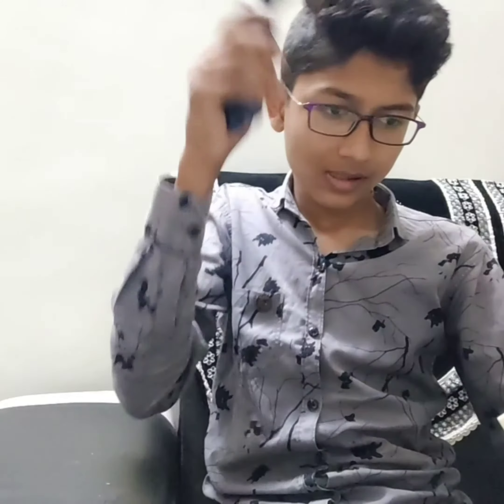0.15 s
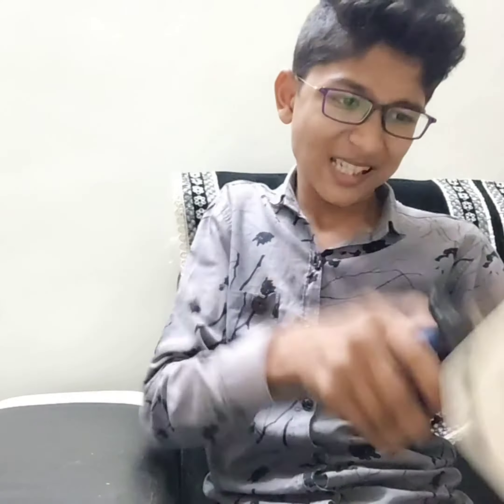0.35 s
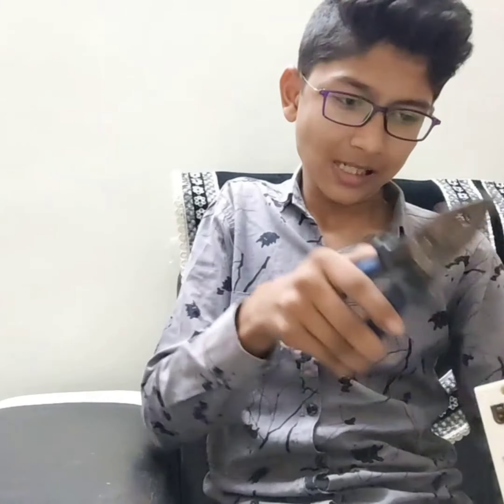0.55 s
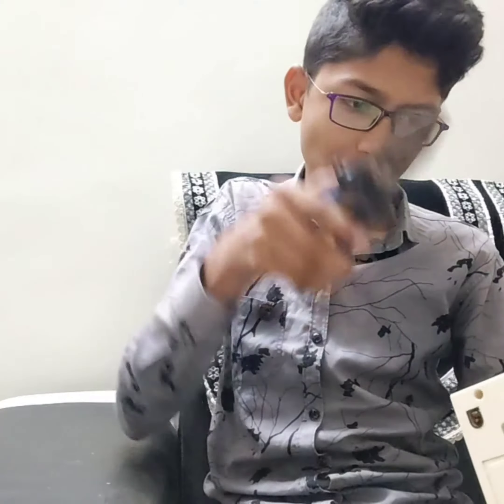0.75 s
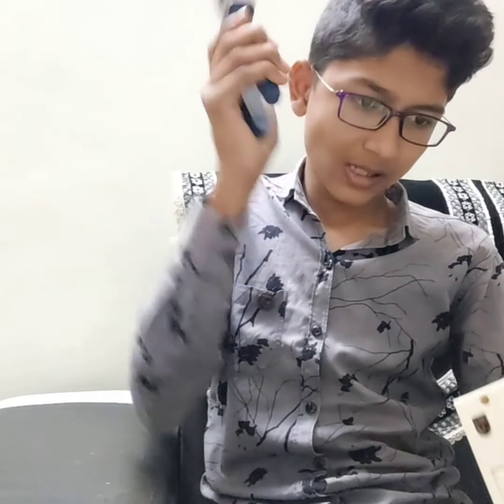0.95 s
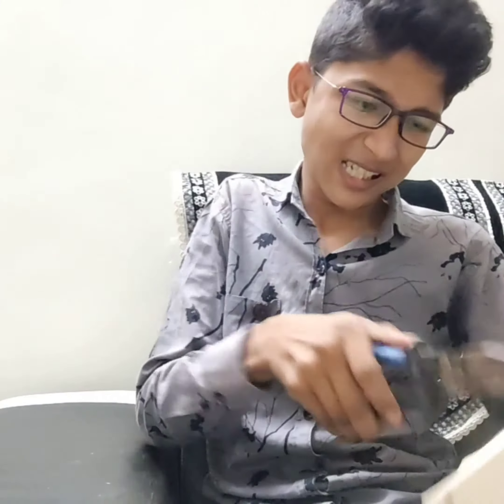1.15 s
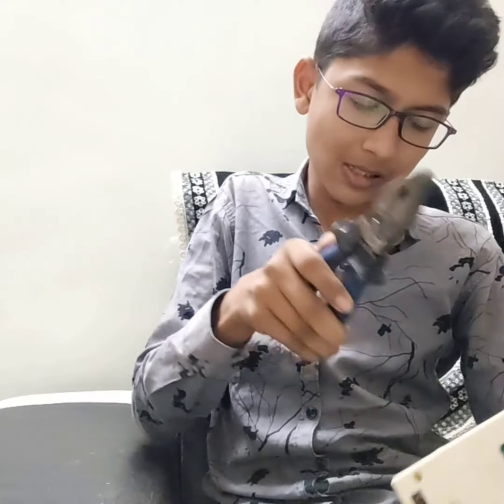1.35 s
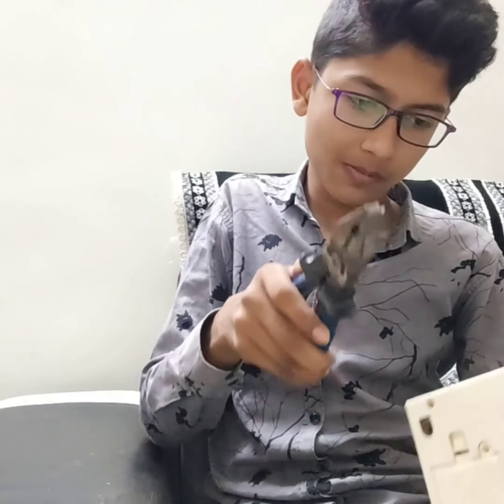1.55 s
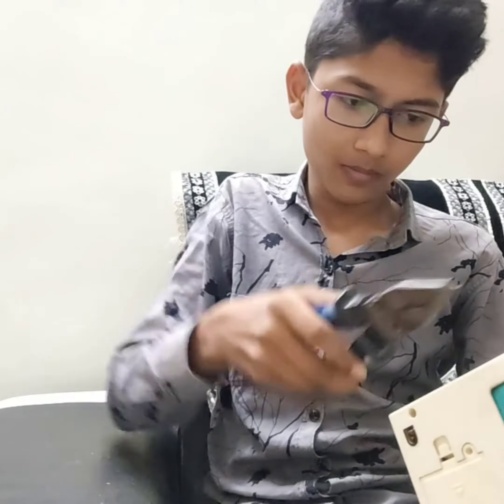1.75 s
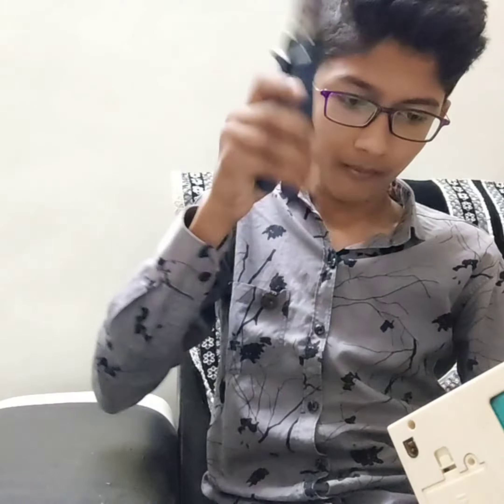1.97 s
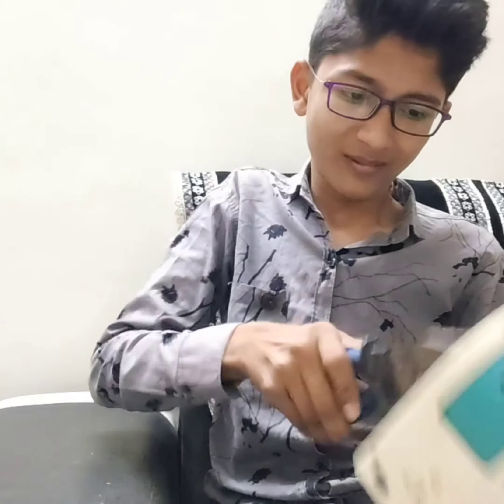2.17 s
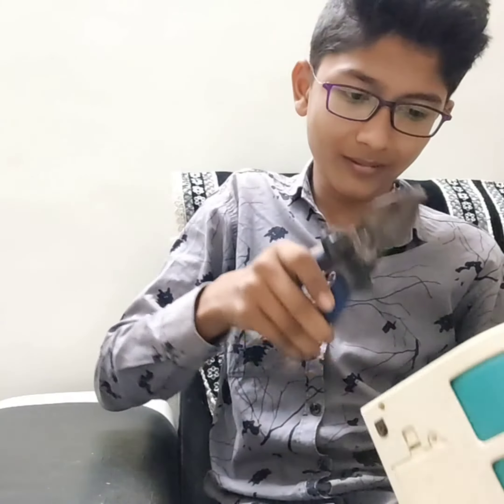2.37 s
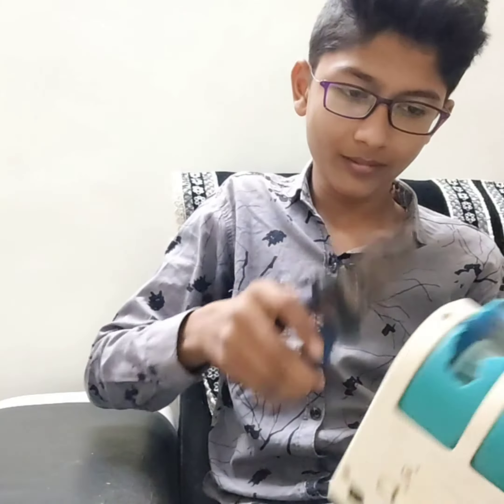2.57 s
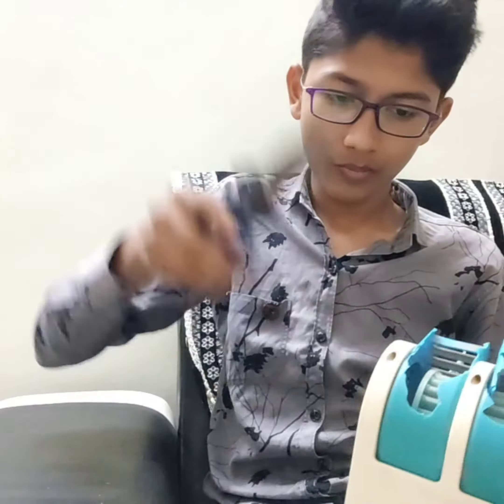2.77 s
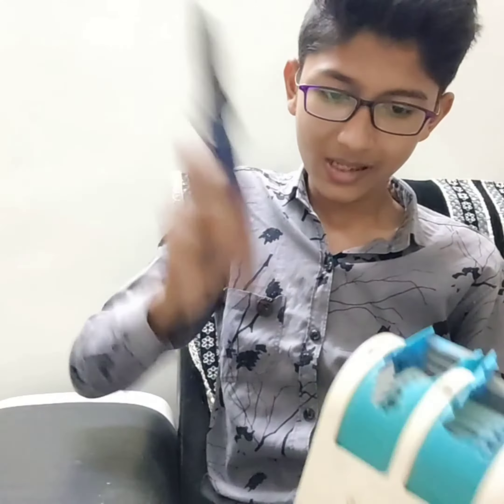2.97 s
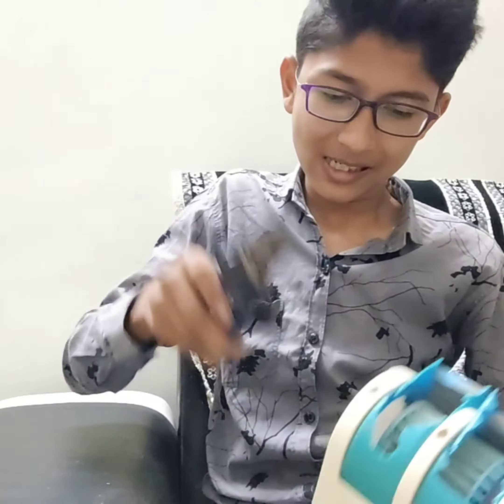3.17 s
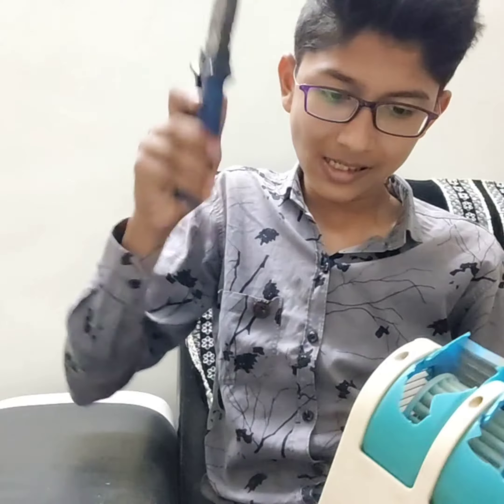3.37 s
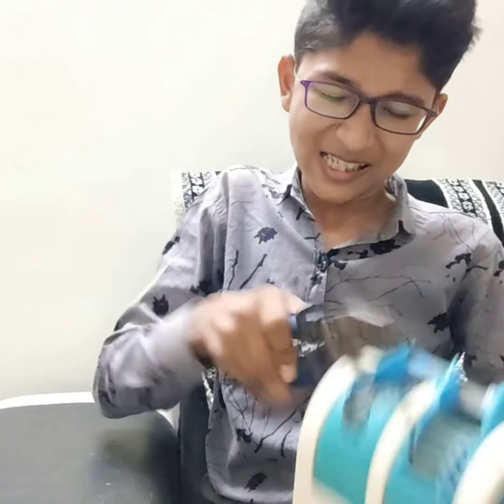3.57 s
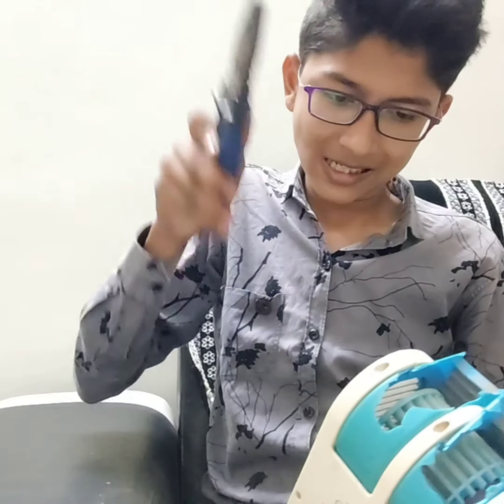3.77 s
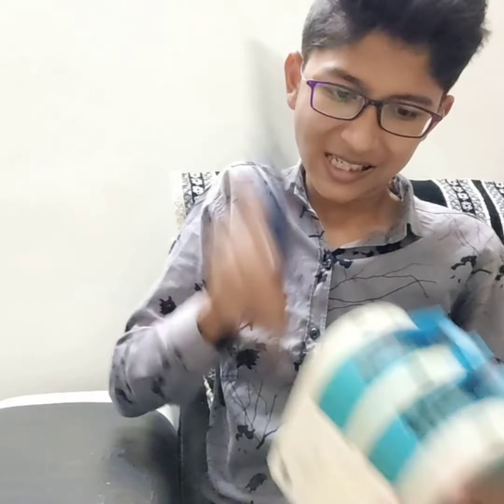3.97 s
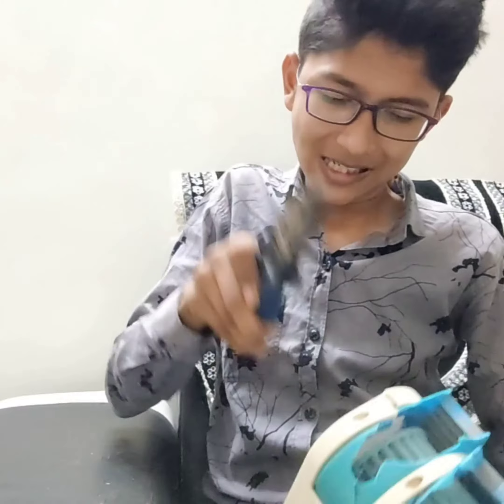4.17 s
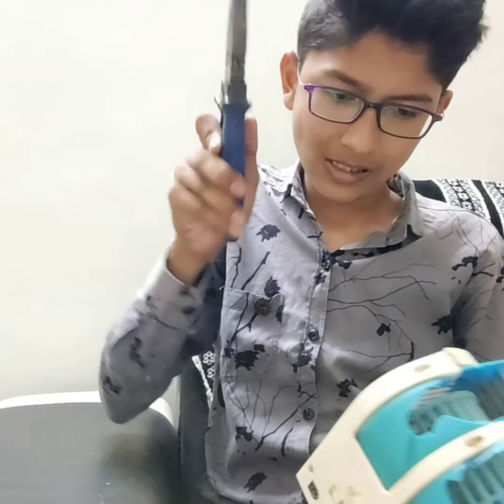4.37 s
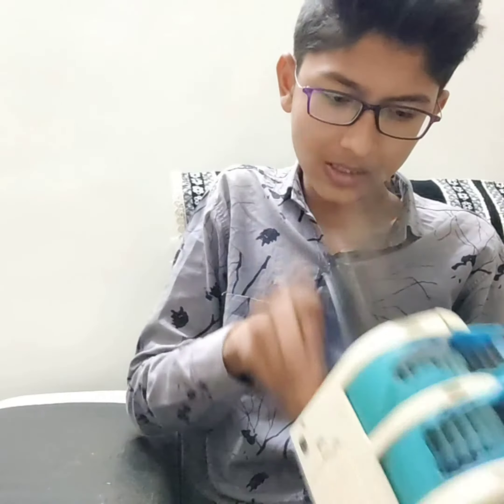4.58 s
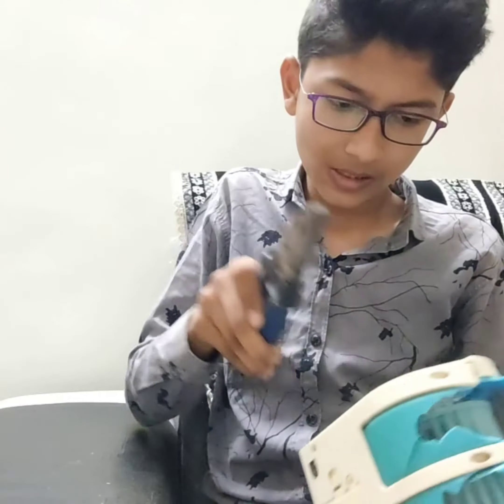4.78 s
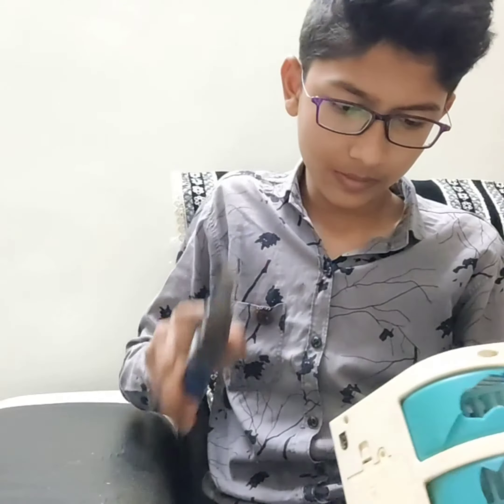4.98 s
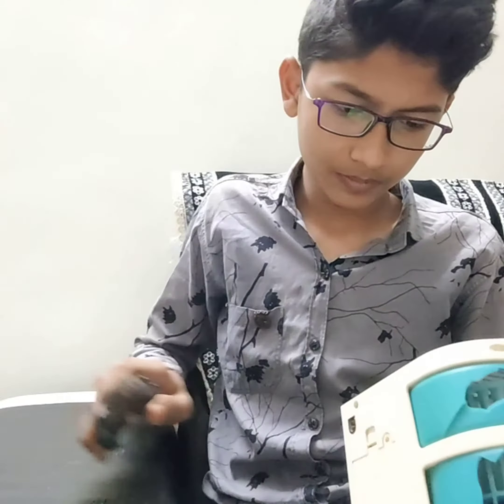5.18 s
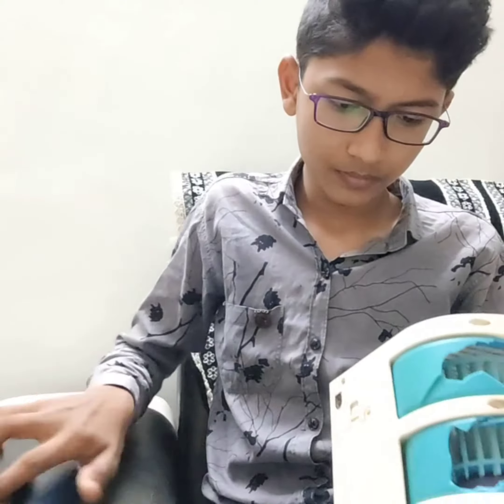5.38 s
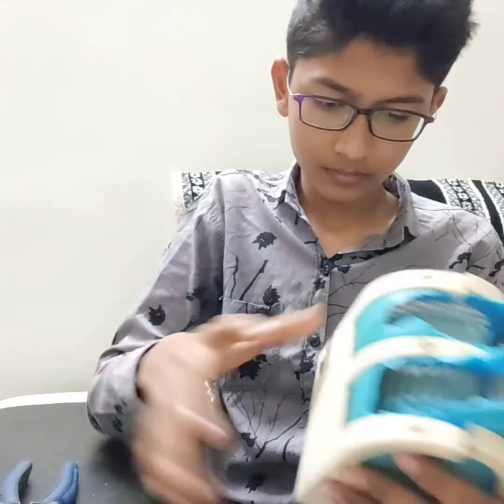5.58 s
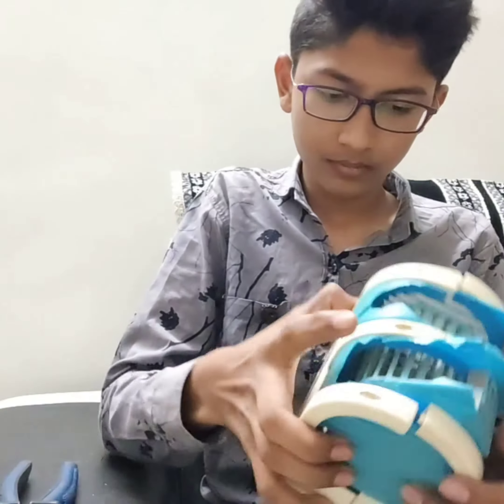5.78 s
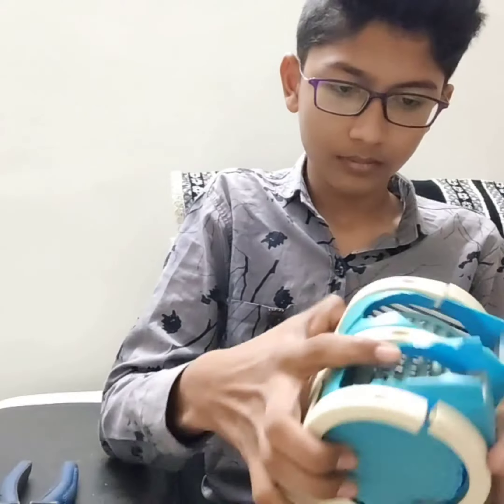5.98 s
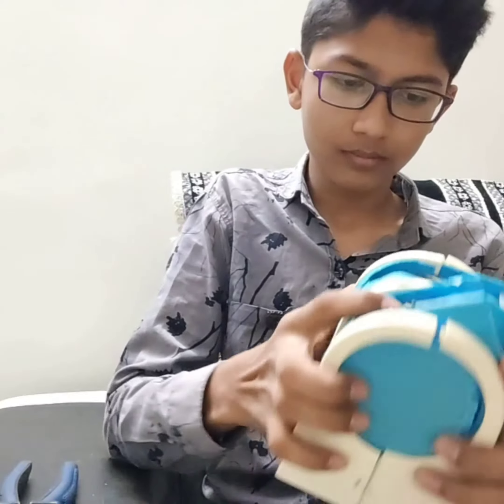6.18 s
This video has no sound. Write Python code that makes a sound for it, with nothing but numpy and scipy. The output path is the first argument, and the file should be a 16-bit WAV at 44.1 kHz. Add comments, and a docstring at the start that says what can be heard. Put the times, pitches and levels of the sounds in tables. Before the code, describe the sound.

Steel pliers hammer a hollow plastic appliance housing in eight hard, cracking blows that echo in a bare room, then faint taps and finger rubbing.

```python
"""Pliers on a plastic housing

Steel pliers hammer the plastic housing of a small appliance, eight blows in a bare, echoing room.
Each blow is filtered noise: a snap, a crush of small fractures and a thump of the hollow shell, all with echo.
Loose jaws tick between swings; then air stirs, the pliers are laid on the table, and fingers tap and slide
on the housing. Room hush, hiss and low rumble lie beneath. A phone's limiter ducks loud blows."""
import sys
import numpy as np
from scipy import signal
from scipy.fft import rfft, irfft, next_fast_len
from scipy.io import wavfile
from scipy.ndimage import uniform_filter1d, minimum_filter1d, map_coordinates

SR = 44100
rng = np.random.default_rng(int(sys.argv[2]) if len(sys.argv) > 2 else 0)


def materialize(psi):
    """Save the field psi as 16-bit PCM at rate SR to the path in sys.argv[1].

    A 1-D psi becomes a single channel; in a 2-D psi each row is a channel.
    """
    bounded = np.clip(np.atleast_2d(psi).T, -1, 1)
    quanta = np.round(bounded * 32767).astype(np.int16)
    wavfile.write(sys.argv[1], SR, quanta)


N = 275079
TIME_S = np.arange(N) / SR
AGE_S = np.arange(SR // 4) / SR  # time since a contact

# Hammer blows. Each row: start in seconds, gain of the whole blow in dB, crush gain in dB,
# crush length in seconds, thump gain in dB, thump length in seconds, thump pitch in Hz,
# base treble tilt in dB per decade, panel mode in Hz, rib mode in Hz, air stirred by the lift before it in dB.
BLOW_ROWS = [(0.4215, -3.5, -4.5, 0.08, -1.5, 0.036, 164.4, 2.5, 646, 2930, -56),
             (1.1556, -5, -3, 0.074, -2, 0.034, 138, 1, 500, 900, -44),
             (2.1990, -4, -5.5, 0.041, -5.5, 0.0027, 212, -1, 860, 1450, -49.5),
             (2.6796, -15.5, -28, 0.006, -21, 0.0052, 130, -3.5, 1380, 1920, -46),
             (3.109, -4, -7, 0.048, -4.5, 0.0083, 138, 4, 1280, 2130, -47),
             (3.5820, -3.5, -5, 0.048, -5.5, 0.016, 144.4, 3.5, 1035, 1470, -48),
             (4.0522, -6, -4, 0.04, -7.5, 0.01, 136, 2.5, 877, 1760, -65),
             (4.64, 0, -14.5, 0.021, -19.5, 0.0058, 171.5, 4.5, 920, 3460, -67)]
# Light contacts with table and housing. Each row: start in seconds, gain in dB, thump gain in dB,
# treble tilt in dB per decade, panel mode in Hz, rib mode in Hz.
KNOCK_ROWS = [(5.4488, -32, -2, -8.5, 534, 11900), (5.461, -38.5, -2, -15, 320, 1200),
              (5.572, -49, -11, -1, 596, 5000), (5.686, -45, -23, -11, 1610, 2510),
              (5.706, -44, -20, -18, 850, 2800), (5.7217, -43, -22, -4, 1100, 2900),
              (5.795, -51, -7, 10, 800, 14100), (5.838, -53, -16, 4.5, 700, 9000),
              (5.969, -51, -3, 17, 600, 3000), (6.0759, -26, -27, -21.5, 810, 2380),
              (6.142, -49.5, 2, 5, 800, 13000)]
# Plier jaws touching. Each row: start in seconds, relative level in dB,
# lower and upper mode in dB over the click.
JAW_TICKS = [(1.8067, -20.5, 8, 10), (1.8093, -21.5, 15.5, 2), (1.936, -37, 25, 0), (1.956, -24.5, 14, 22),
             (2.086, -30, 31, 21), (2.1585, -31, 5, 15), (2.167, -30, 12, 4), (4.027, -40, 10.5, 0)]
# Steel jaw modes. Each row: frequency in Hz, width in Hz.
JAW_MODES = [(7036, 120), (7690, 90)]
# Housing resonances. Each row: frequency in Hz, width in Hz, strength in dB over a flat base.
SHELL_MODES = [(559, 29, 4), (586, 6.7, -3.5), (743.6, 19, 8), (904, 8.2, 7), (934, 12, 1.5),
               (1536, 15, 3.5), (1735, 86, -3), (2230, 140, -4), (3160, 100, -7), (3980, 150, -5.5)]
# Table top resonances. Each row: frequency in Hz, width in Hz, strength in dB over a flat base.
TABLE_MODES = [(98, 25, 23), (312, 33, 23), (474, 30, 14)]
# Spectrum of struck plastic. Each row: frequency in Hz, relative density in dB per Hz.
PLASTIC_SPECTRUM = [(40, -57), (200, -6.5), (350, -0.5), (600, 3.5), (1200, 1.5), (2200, 2.5), (3600, 1.5),
                    (4800, -1), (5800, -6.5), (7200, -1.5), (8800, -3), (11000, -6.5), (15500, -7.5)]
# Spectrum of the shell's thump. Each row: multiple of its pitch, relative density in dB per Hz.
THUMP_SPECTRUM = [(.15, -32), (.4, -11.5), (.75, 9), (1.3, 3.5), (2.4, 0), (4, -4.5), (8, -12), (25, -55)]
# Spectrum of a steel click. Each row: frequency in Hz, relative density in dB per Hz.
CLICK_SPECTRUM = [(300, -31), (2500, -11), (4200, -8), (5700, -11), (7300, -4), (10000, -5.5), (15000, 8)]
# Spectrum of the room hush. Each row: frequency in Hz, relative density in dB per Hz.
HUSH_SPECTRUM = [(15, -76.5), (25, -48), (87, -6.5), (127, -7), (229, -8), (285, -1.5), (344, -12),
                 (516, -11), (624, -9.5), (1230, -20), (1440, -25), (2110, -25), (4610, -47.5), (6920, -42),
                 (16000, -41)]
# Spectrum of stirred air and of the table boom. Each row: frequency in Hz, relative density in dB per Hz.
RUMBLE_SPECTRUM = [(25, -37.5), (60, -5.5), (95, 0), (160, -4), (260, -15), (500, -14.5), (1500, -57.5)]
# Colour of the microphone ports. Each row: frequency in Hz, left minus right in dB.
PORT_DIFFERENCE = [(200, 2), (900, -0.5), (3000, 1), (5500, 1), (7000, 6.5), (8600, -6.5), (11000, 1),
                   (14500, 7.5)]
# Decay of the room. Each row: frequency in Hz, time to fall 60 dB in seconds.
ROOM_T60 = [(150, 0.52), (550, 0.59), (1400, 0.61), (3600, 0.57), (8000, 0.5), (15000, 0.38)]
# Fingers sliding on the housing. Each row: firmest grip in seconds, level in dB,
# rise in seconds, fade in seconds.
SLIDE_ROWS = [(5.725, -42.5, 0.023, .05), (5.91, -54.5, .04, .08)]

EARLIER_BLOW_S = -0.44  # the blow before the scene opens
LIFT_MIDDLE_SHARE, LIFT_SPREAD_SHARE = 0.49, 0.32  # of the pause between blows
DOWNSWING_LEAD_S, DOWNSWING_SPREAD_S, DOWNSWING_DB = 0.035, 0.055, -48.5
# a last soft swell of low rumble before the pliers land
LAST_SWELL_S, LAST_SWELL_SPREAD_S, LAST_SWELL_DB = 5.2, 0.16, -46.5
STILL_AIR_DB = -59.5  # rumble while the arm rests
GRIP_DB = -62  # steady faint rub of the holding hand
LANDING_S, TABLE_START_DB, TABLE_T60_S = 5.45, -39, 0.55
BAND_LIMIT_HZ = 15450


def amp(db):
    """Decibels to gain."""
    return 10 ** (np.asarray(db) / 20)


def unit(x):
    """Scale to rms 1."""
    return x / np.sqrt(np.mean(x ** 2) + 1e-20)


def along(points, hz):
    """Interpolate (Hz, value) points on a log frequency axis."""
    point_hz, values = np.transpose(points)
    return np.interp(np.log(hz + 1e-3), np.log(point_hz), values)


def wobble(knots_per_s):
    """A smooth random curve through evenly spaced knots."""
    knots = rng.standard_normal(int(N * knots_per_s / SR) + 4)
    return map_coordinates(knots, [TIME_S * knots_per_s])


def swell(middle_s, spread_s):
    """A smooth rise and fall."""
    return np.exp(-((TIME_S - middle_s) / spread_s) ** 2)


def add(track, start_s, sound):
    """Mix a stereo sound into the track."""
    part = track[:, round(start_s * SR):][:, :sound.shape[1]]
    part += sound[:, :part.shape[1]]


def coloured(x, gain):
    """Causal minimum-phase filter, built by folding the cepstrum of gain(hz)."""
    n = x.shape[-1]
    m = 2 * next_fast_len(n // 2 + 4096)
    hz = np.fft.rfftfreq(m, 1 / SR)
    cepstrum = irfft(np.log(np.maximum(gain(hz), 1e-6)))
    cepstrum[..., 1:m // 2] *= 2
    cepstrum[..., m // 2 + 1:] = 0
    response = np.exp(rfft(cepstrum))
    return irfft(rfft(x, m) * response, m)[..., :n]


def noise(size, alike):
    """Stereo noise with a shared part that reaches the left port 4 samples first."""
    shared = rng.standard_normal(size)
    share = np.clip(alike, 0, 1)
    common = np.array([shared, np.roll(shared, 4)])
    separate = rng.standard_normal((2, size))
    return np.sqrt(share) * common + np.sqrt(1 - share) * separate


def resonances(modes, hz):
    """Gain of (Hz, width Hz, dB) modes standing on a flat base."""
    power = sum(amp(db) ** 2 / (1 + (2 * (hz - mode_hz) / width_hz) ** 2)
                for mode_hz, width_hz, db in modes)
    return np.sqrt(1 + power)


def burst(envelope, gain, alike):
    """A dense run of tiny impulses through a body, with the energy of its envelope."""
    sound = coloured(envelope * noise(len(envelope), alike), gain)
    return unit(sound) * np.sqrt(np.mean(envelope ** 2))


def in_room(envelope, gain, wet_db, alike):
    """A contact's direct burst plus the diffuse echo that it feeds; treble dies first."""
    hz, t, z = signal.stft(rng.standard_normal((2, SR)), SR, nperseg=256)
    # reflections arrive in clumps, each with its own colour
    clumps = uniform_filter1d(rng.standard_normal(z.shape[1:]), size=6, axis=0)
    clumps = unit(uniform_filter1d(clumps, size=4, axis=1))
    clumps_db = 1.7 * clumps + 0.7 * rng.standard_normal(len(t))
    decay_db = -60 * t / along(ROOM_T60, hz)[:, None]
    tail = signal.istft(z * amp(clumps_db + decay_db), SR, nperseg=256)[1][:, :SR]
    # the echo builds up while the contact lasts; energy fed in later has had less time to die
    fed = np.cumsum(envelope ** 2 * amp(60 * AGE_S / along(ROOM_T60, 2000)) ** 2)
    build = np.sqrt(np.interp(np.arange(SR) / SR - 0.003, AGE_S, fed, left=0))  # 3 ms late
    contact_rms = np.sqrt(np.sum(envelope ** 2) / SR)
    sound = amp(wet_db) * unit(coloured(build * tail, gain)) * contact_rms
    add(sound, 0, burst(envelope, gain, alike))
    return sound


def plastic(tilt_db_per_decade, struck_modes):
    """Gain of the housing: its own resonances and those of the spot that is struck."""
    strengths = rng.standard_normal(1024)  # every contact excites the crowded small modes differently

    def gain(hz):
        crowd_db = 1.9 * np.interp(hz, np.linspace(0, SR / 2, len(strengths)), strengths)
        tilt_db = tilt_db_per_decade * np.log10(np.maximum(hz, 600) / 1000)
        level = amp(along(PLASTIC_SPECTRUM, hz) + tilt_db + crowd_db)
        return level * resonances(SHELL_MODES + struck_modes, hz)
    return gain


def click_gain(hz):
    """Spectrum of steel in a brief hard contact."""
    return amp(along(CLICK_SPECTRUM, hz))


def snap(length_s):
    """Force of one hard contact: a quick rise and a fall within milliseconds."""
    rise = 1 - np.exp(-AGE_S / (0.19 * length_s))
    return rise * np.exp(-(AGE_S / length_s) ** 2)


def thump(length_s, boom_hz):
    """The hollow shell is shoved at impact, and again when the pliers come to a stop."""
    shove = np.exp(-AGE_S / 0.052) * np.exp(-(AGE_S / length_s) ** 4)
    stop = 0.78 * np.exp(-((AGE_S - length_s) / 0.0028) ** 2)
    return in_room(shove + stop, lambda hz: amp(along(THUMP_SPECTRUM, hz / boom_hz)), wet_db=-23, alike=0.65)


def motion():
    """Strength of stirred air: a slow lift and fast downswing for each blow, then a last soft swell."""
    strength = amp(LAST_SWELL_DB) * swell(LAST_SWELL_S, LAST_SWELL_SPREAD_S)
    last_s = EARLIER_BLOW_S
    for start_s, *_, lift_db in BLOW_ROWS:
        pause_s = start_s - last_s
        lift = swell(last_s + LIFT_MIDDLE_SHARE * pause_s, LIFT_SPREAD_SHARE * pause_s)
        downswing = swell(start_s - DOWNSWING_LEAD_S, DOWNSWING_SPREAD_S)
        strength = strength + amp(lift_db) * lift + amp(DOWNSWING_DB) * downswing
        last_s = start_s
    return strength


def background():
    """Room hush, a narrow band of hiss and lumps of stirred air, all shaped noise."""
    hush = unit(coloured(noise(N, alike=0.8), lambda hz: amp(along(HUSH_SPECTRUM, hz))))
    hiss = unit(coloured(noise(N, alike=0.2), lambda hz: 1 / (1 + ((hz - 7000) / 380) ** 2)))
    rumble = coloured(noise(N, alike=0.49), lambda hz: amp(along(RUMBLE_SPECTRUM, hz)))
    air = unit(amp(3 * wobble(22)) * rumble)
    air_level = np.hypot(amp(STILL_AIR_DB), motion())
    return amp(-53) * hush + amp(-67.5) * hiss + air_level * air


def old_echo():
    """The room is still ringing from an earlier blow."""
    out = np.zeros((2, N))
    blow = in_room(snap(length_s=0.0118), plastic(-1.3, []), wet_db=4.5, alike=0.5)
    add(out, 0, amp(3.5) * blow[:, round(-EARLIER_BLOW_S * SR):])
    return out


def rubbing():
    """Skin slides over the housing in small catches; each slide tightens and lets go."""
    catches = unit(amp(1.5 * wobble(60) + 3 * wobble(700)))
    pressure = amp(GRIP_DB)
    for grip_s, db, rise_s, fade_s in SLIDE_ROWS:
        fall = np.maximum((grip_s - TIME_S) / rise_s, (TIME_S - grip_s) / fade_s)
        pressure = pressure + amp(db) * np.exp(-fall)
    return burst(catches * pressure, plastic(-6.5, []), alike=0.21)


def table():
    """The table top booms briefly in its own modes when the pliers are put down."""
    out = np.zeros((2, N))
    gain = lambda hz: amp(along(RUMBLE_SPECTRUM, hz)) * resonances(TABLE_MODES, hz)
    decay = amp(TABLE_START_DB - 60 * AGE_S / TABLE_T60_S)
    add(out, LANDING_S, burst(decay, gain, alike=1.0))
    return out


def jaws():
    """The loose steel jaws click together and ring thinly in two modes."""
    out = np.zeros((2, N))
    contact = snap(length_s=0.0016)
    for start_s, db, *modes_db in JAW_TICKS:
        modes = [(hz, width_hz, mode_db) for (hz, width_hz), mode_db in zip(JAW_MODES, modes_db)]
        gain = lambda hz: click_gain(hz) * resonances(modes, hz)
        add(out, start_s, amp(db + 1.5) * in_room(contact, gain, wet_db=-3, alike=0.48))
    return out


def knocks():
    """The pliers land on the table; fingers tap and creak the broken shell."""
    out = np.zeros((2, N))
    for start_s, db, thump_db, tilt_db, panel_hz, rib_hz in KNOCK_ROWS:
        spot = [(panel_hz, 170, 9), (rib_hz, 0.24 * rib_hz, 5)]
        tap = in_room(snap(length_s=0.004), plastic(tilt_db, spot), wet_db=-1.5, alike=0.4)
        shell = amp(thump_db) * thump(length_s=0.005, boom_hz=89)
        add(out, start_s, amp(db) * (2.43 * tap + shell))
    return out


def blows():
    """A snap, then a spray of small fractures while the pliers drive on into the plastic."""
    out = np.zeros((2, N))
    for (start_s, db, crush_db, crush_s, thump_db, thump_s, boom_hz,
         tilt_db, panel_hz, rib_hz, _) in BLOW_ROWS:
        spot = [(panel_hz, 110, 6), (rib_hz, 300, 2)]
        knots_s = AGE_S[::40]
        fractures = unit(amp(7.2 * np.interp(AGE_S, knots_s, rng.standard_normal(len(knots_s)))))
        crush_force = fractures * np.exp(-(AGE_S / crush_s) ** 4)
        crush = in_room(crush_force, plastic(tilt_db + 3.5, spot), wet_db=3.5, alike=0.81)
        first = in_room(snap(length_s=0.0075), plastic(tilt_db - 3.0, spot), wet_db=-2.0, alike=0.17)
        # steel meets plastic with a split-second click
        add(first, 0, amp(-4.5) * burst(snap(length_s=0.0016), click_gain, alike=0.3))
        shell = amp(thump_db) * thump(thump_s, boom_hz)
        add(out, start_s, amp(db) * (1.35 * first + amp(crush_db) * crush + shell))
    return out


def scene():
    """Everything as it reaches two microphone ports; near sounds take each port's own colour."""
    near = old_echo() + rubbing() + table() + jaws() + knocks() + blows()
    sides = np.array([[0.5], [-0.5]])  # left, right
    return background() + coloured(near, lambda hz: amp(along(PORT_DIFFERENCE, hz) * sides))


def limiter(x, ceiling_db, hold_s, release_s):
    """Gain drops almost at once under a loud sound, holds, then recovers quickly."""
    power = np.abs(uniform_filter1d(np.mean(x ** 2, axis=0), size=160))
    needed_db = np.minimum(0, ceiling_db - 10 * np.log10(power + 1e-12))
    half = int(hold_s * SR / 2)
    held_db = minimum_filter1d(needed_db, 2 * half + 1, origin=half)
    keep = np.exp(-1 / (release_s * SR))
    recovering_db = signal.lfilter([1 - keep], [1, -keep], held_db)
    gain_db = uniform_filter1d(np.minimum(held_db, recovering_db), size=48)
    return x * amp(gain_db)


def record(dry):
    """The phone limits the blows, cuts the deepest bass, rounds peaks and stops at its band limit."""
    limited = limiter(dry, ceiling_db=-9.0, hold_s=0.088, release_s=0.0051)
    lean = signal.sosfilt(signal.butter(2, 48, "high", fs=SR, output="sos"), limited)
    rounded = lean / (1 + (lean / 0.85) ** 6) ** (1 / 6)
    m = next_fast_len(N + SR)
    hz = np.fft.rfftfreq(m, 1 / SR)
    low_pass = 1 / np.sqrt(1 + (hz / BAND_LIMIT_HZ) ** 160)
    return irfft(rfft(rounded, m) * low_pass, m)[:, :N]


dry = scene()
out = record(dry)
materialize(out)
```